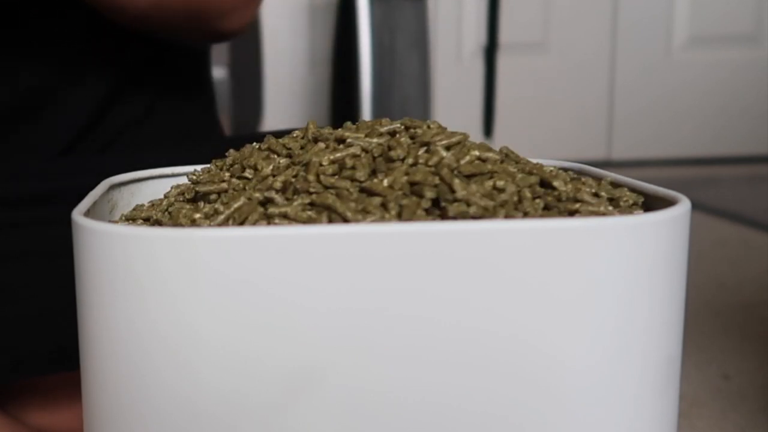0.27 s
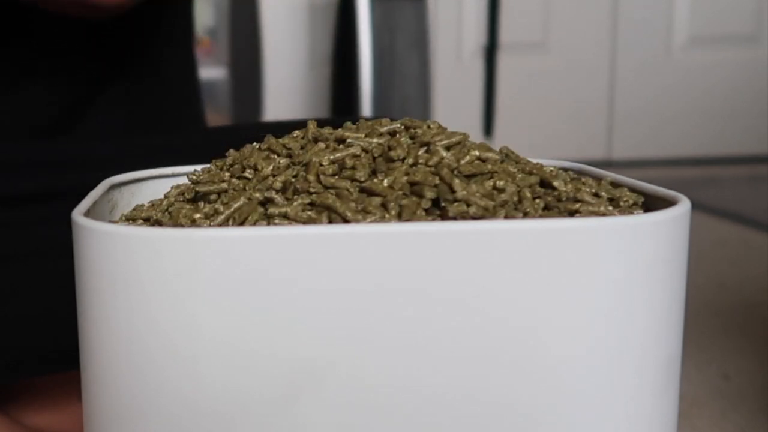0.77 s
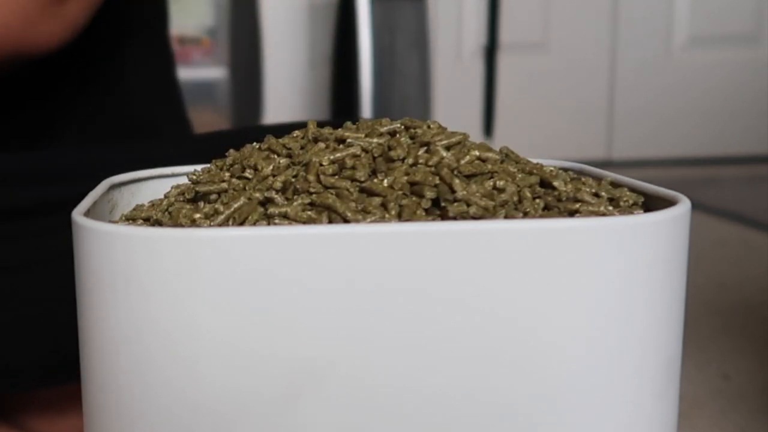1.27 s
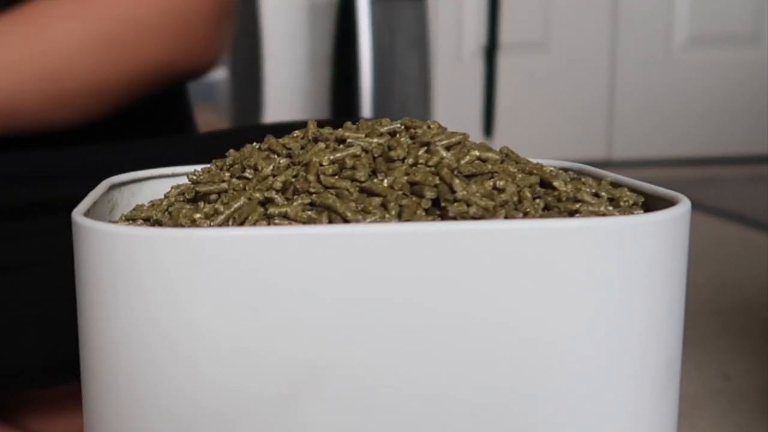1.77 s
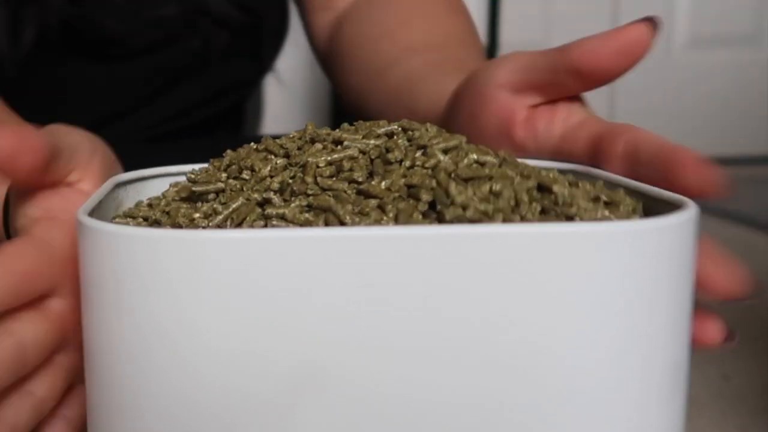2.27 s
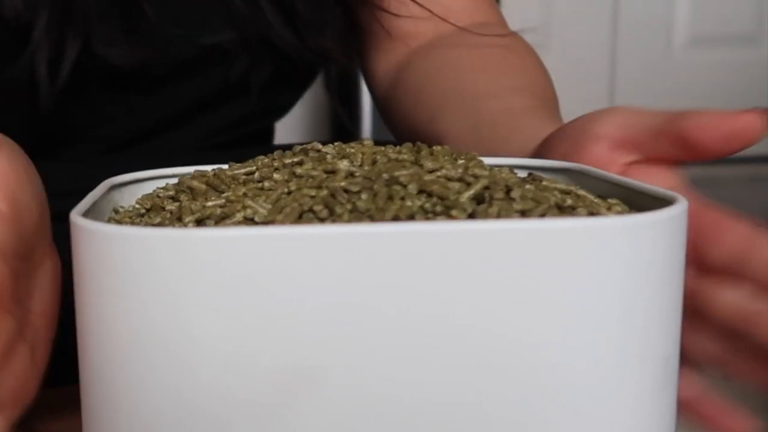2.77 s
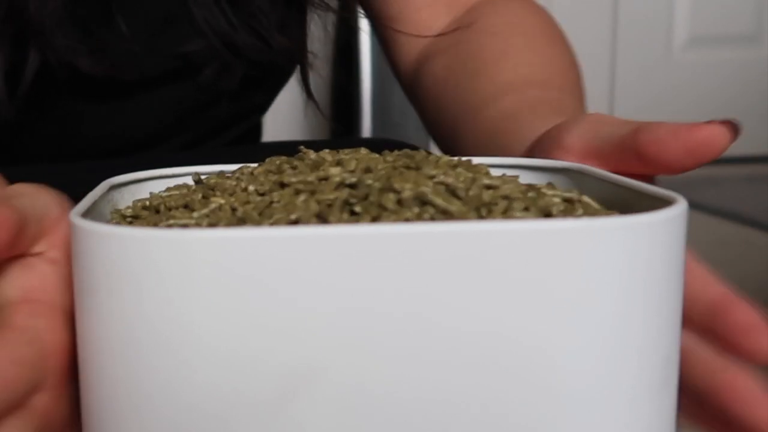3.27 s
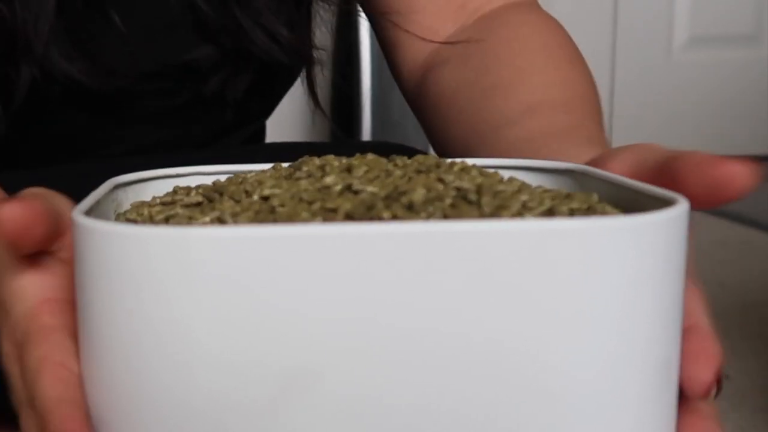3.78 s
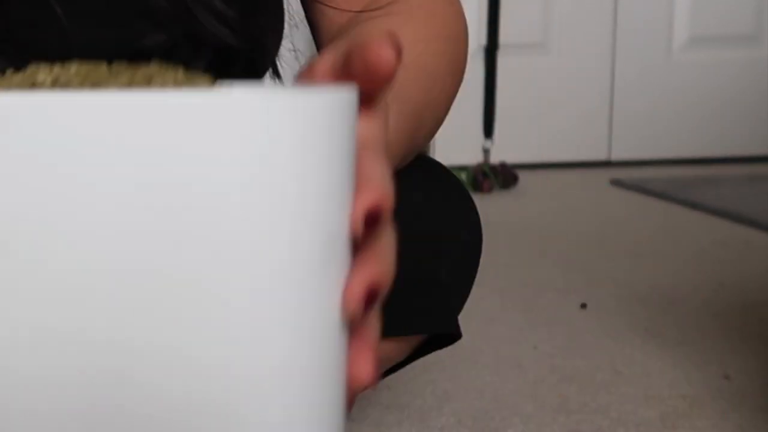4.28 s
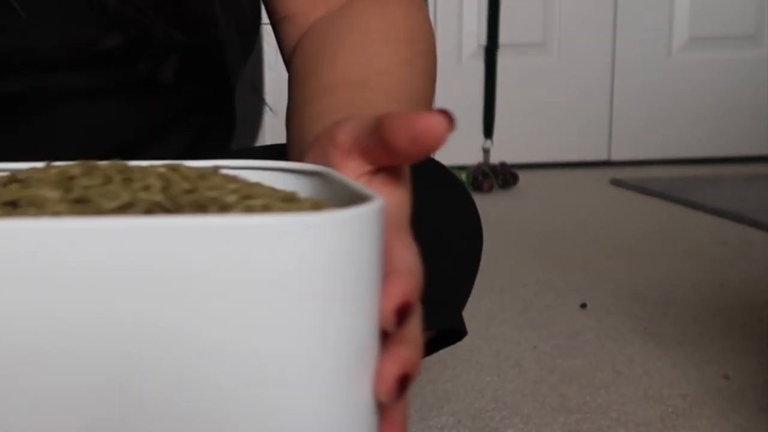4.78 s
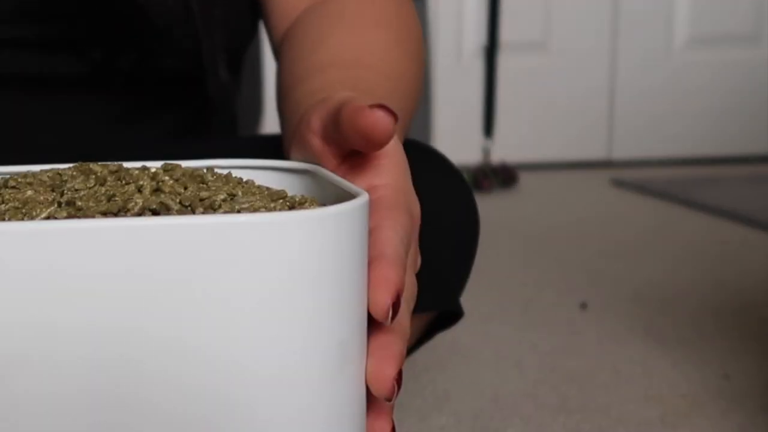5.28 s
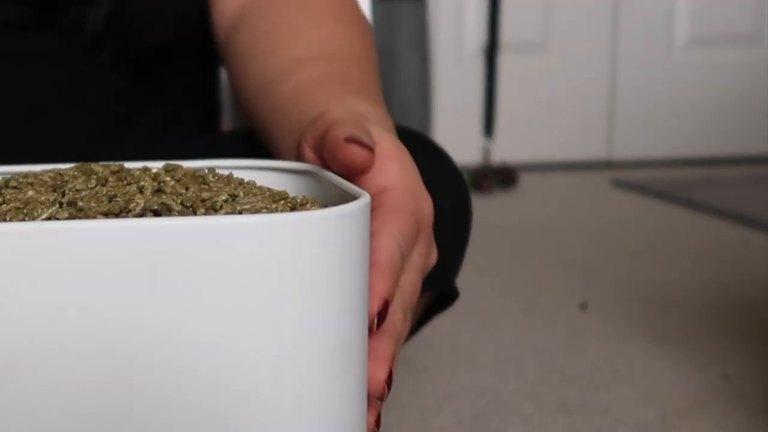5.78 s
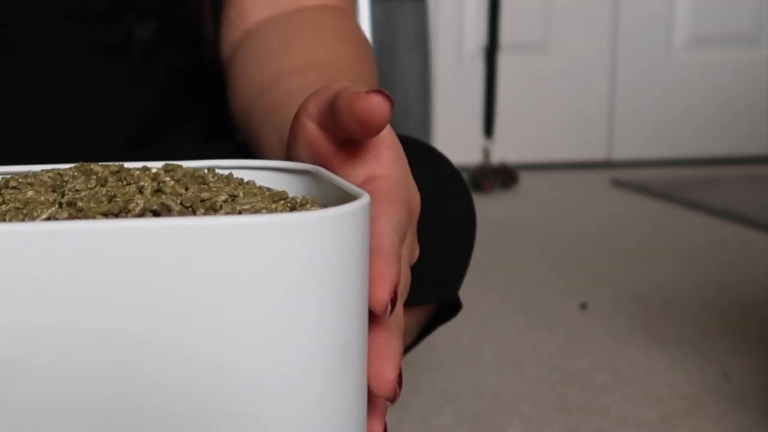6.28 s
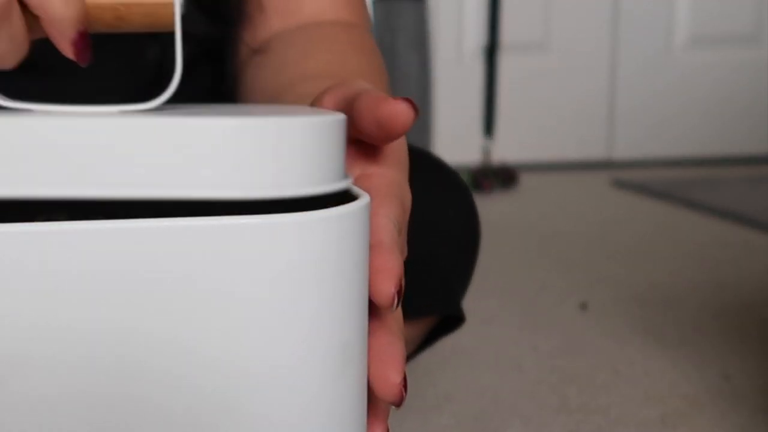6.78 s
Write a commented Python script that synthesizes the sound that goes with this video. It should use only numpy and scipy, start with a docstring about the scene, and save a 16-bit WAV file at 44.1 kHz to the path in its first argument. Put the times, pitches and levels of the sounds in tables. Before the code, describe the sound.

Close stereo microphone, small room with low rumble and slight hiss. First, crisp bag crinkling with snaps and low flaps, fading out. Next, nine quick irregular palm slaps on a metal bin packed with dry pellets, thudding and shaking loose little rattles. A soft set-down and tiny grainy shifts follow, then a quiet gap, barely audible lid rubbing and squeaks, and one loud short metallic clank with a small seating knock.

```python
"""Handling a bin of pellets

A metal bin full of dry feed pellets stands on the floor of a small room, heard from close by.
A bag is dragged aside, its creases crackling by stick-slip; two hands pat the bin nine times, ringing
its damped wall, and the pellets settle after each pat in a rattle of collisions. The bin is lifted and
set down; its tin lid is picked up with a faint frictional scrape and dropped on with a modal clank."""
import sys
import numpy as np
from scipy import signal
from scipy.fft import rfft, irfft
from scipy.io import wavfile
from scipy.ndimage import uniform_filter1d

SR = 44100
rng = np.random.default_rng(int(sys.argv[2]) if len(sys.argv) > 2 else 0)


def to_wav(s):
    """Save 16-bit WAV."""
    ch = np.atleast_2d(s).T  # columns
    pcm = np.round(np.clip(ch, -1, 1) * 32767)  # PCM
    wavfile.write(sys.argv[1], SR, pcm.astype(np.int16))


N = 310464
TIME = np.arange(N) / SR

# creases of the bag snapping: start_s, level_db, decay_s, treble_db
SNAPS = [(0.049, -36.5, 0.0066, -6), (0.103, -33, 0.00079, -5), (0.138, -36, 0.0025, -6),
         (0.221, -28, 0.0027, -13), (0.268, -37, 0.001, -11), (0.274, -27, 0.005, -1),
         (0.296, -34, 0.001, -7), (0.318, -27, 0.0048, -1), (0.495, -32.5, 0.0026, -1),
         (0.612, -33.5, 0.0031, -26), (0.646, -40.5, 0.0021, 1), (0.681, -32.5, 0.0038, 11),
         (0.704, -34, 0.0046, -10), (0.722, -43, 0.003, -8.5), (0.81, -28, 0.0098, -11),
         (0.831, -26.5, 0.0044, 12), (0.8369, -25, 0.00053, 17), (0.839, -22.5, 0.002, 32.5),
         (0.895, -30, 0.012, 1), (0.971, -35.5, 0.02, -24), (1.031, -31.5, 0.0034, 5),
         (1.075, -40, 0.002, -20), (1.0944, -33.5, 0.0012, -1), (1.123, -24, 0.0015, 31),
         (1.19, -37, 0.0039, 20), (1.276, -35.5, 0.0024, 9), (1.331, -29, 0.019, 3),
         (1.54, -52, 0.0026, -28), (1.675, -54.5, 0.0014, 9), (1.6845, -52, 0.00023, -5),
         (1.71, -50, 0.007, -35)]
# spectrum of a crease snapping or a hard edge striking: frequency_hz, relative_gain_db
SNAP_SPECTRUM = [(120, -54), (200, -16), (560, 8.5), (1750, 1), (2700, 4), (4810, -11.5), (5760, -15.5),
                 (6530, -16.5), (9380, -33.5), (11200, -47), (15000, -40.5)]
# blows on the bin, nine pats and the set-down: start_s, slap_db, thump_db, thump_hz, treble_db,
# rattle_db (pellets shaken loose), early_s (lead of a first graze), graze_db, graze_decay_s
BLOWS = [(2.003, -33.5, -33.5, 210, -26, -62, 0.0023, -67, .01),
         (2.324, -21.5, -27, 217, 28, -42, 0.013, -44, 0.014),
         (2.508, -32, -30.5, 228, 1, -50, 0.01, -51, 0.0098),
         (2.689, -32.5, -29, 211, 4, -49, 0.024, -48.5, 0.0064),
         (2.902, -31.5, -25, 233.6, 21, -43.5, 0.02, -40, 0.0092),
         (3.078, -28, -34.5, 166.6, 3.5, -45.5, 0.016, -48, 0.02),
         (3.269, -26.5, -29.5, 214.5, 8.5, -45.5, 0.0097, -35, 0.029),
         (3.4595, -24, -23, 208.4, 10, -39, 0.001, -44, 0.0049),
         (3.68, -26.5, -23, 232, 29, -37, 0.0047, -40, 0.015),
         (4.423, -43.5, -46.5, 165, -13, -55, 0.011, -51.5, 0.029)]
# spectrum of pellets colliding: frequency_hz, relative_gain_db
PELLET_SPECTRUM = [(180, -68), (300, -5.5), (835, -4), (3690, -0.5), (5390, -8.5), (7500, -12.5),
                   (10100, -26.5), (10800, -70), (11300, -45), (12100, -20.5), (14300, -37), (15500, -89)]
# the heap slipping by itself as the bin is handled: start_s, crunch_db, crunch_decay_s, rattle_db
SLIPS = [(2.018, -53, 0.0034, -63), (2.042, -52, 0.002, -64.5), (2.156, -59, 0.013, -75),
         (3.859, -53, 0.0034, -60), (4.427, -35, 0.012, -57), (4.466, -46.5, 0.0053, -55.5),
         (4.506, -56, 0.0089, -65), (4.523, -49.5, 0.0031, -59), (4.558, -54, 0.0033, -65),
         (4.66, -65, 0.0033, -84), (4.701, -67.5, 0.0022, -84), (4.881, -66, .003, -77),
         (4.908, -66, .003, -82), (4.988, -54.5, 0.012, -70), (5.029, -60, 0.0024, -85),
         (5.138, -58, .004, -84), (5.231, -67.5, 0.00085, -86)]


def amp(db):
    """Level: decibels become a gain in amplitude."""
    return np.exp(np.asarray(db) * np.log(10) / 20)


def unit(x):
    """Normalisation: a signal is scaled to rms 1."""
    return x / np.sqrt(np.mean(x ** 2) + 1e-20)


def punch(sound):
    """Equal energy: a short sound is scaled to the energy of 3 ms at rms 1."""
    return sound * np.sqrt(round(.003 * SR)) / np.linalg.norm(sound)


def read(points, hz):
    """Interpolation: a curve is read on a log-frequency axis."""
    f, value = np.transpose(points)
    return np.interp(np.log(hz + 1), np.log(f + 1), value)


def add(mix, s, sound):
    """Superposition: a sound is mixed in at time s."""
    part = mix[max(round(s * SR), 0):][:len(sound)]
    part += sound[:len(part)]


def colour(x, spectrum, size=4096):
    """Minimum-phase filtering: the log gain fixes the phase, so the response is causal."""
    gain_db = read(spectrum, abs(np.fft.fftfreq(size, 1 / SR)))
    log_gain = np.log(amp(np.maximum(gain_db, -100)))
    response = np.exp(np.conj(signal.hilbert(log_gain)))
    taps = np.fft.ifft(response).real[:size // 2]
    return signal.oaconvolve(x, taps)[:len(x)]


def shelf(x, db, corner_hz):
    """Shelving: the part above a first-order crossover is raised or lowered."""
    low = signal.lfilter(*signal.butter(1, corner_hz, fs=SR), x)
    return low + amp(db) * (x - low)


def grains(per_s, spread_db, size=N):
    """Shot noise: a steady random train of tiny collisions, a few much larger than the rest."""
    chance, large, sign = rng.random(size), rng.exponential(1, size), rng.standard_normal(size)
    hit, force = chance < per_s / SR, np.zeros(size)
    force[hit] = amp(spread_db * np.minimum(large[hit], 4)) * sign[hit]
    return unit(force)


def crack(decay_s, spectrum, grit, size=4096):
    """Impulsive contact: a sharp click with an exponentially dying burst of noise."""
    t = np.arange(size) / SR
    burst = grit * rng.standard_normal(size) * np.exp(-t / max(decay_s, 1e-4))
    click = t == 0
    return colour(burst + click, spectrum)


def ring(modes, t):
    """Modal superposition: sines of random phase, each dying by 60 dB in its t60."""
    return sum(amp(db - 60 * t / t60) * np.sin(2 * np.pi * (hz * t + rng.random()))
               for hz, db, t60 in modes)


def wander(depth_db, size):
    """Slow modulation: a gain drifts at random over about size samples, depth_db in rms."""
    step = 64
    noise = rng.standard_normal(len(TIME[::step]))
    drift = uniform_filter1d(uniform_filter1d(noise, size // step), size // step // 3)
    return np.interp(TIME, TIME[::step], amp(depth_db * unit(drift)))


def swell(start, rise, hold, release):
    """Motion envelope: a movement gathers speed, holds it and decays exponentially."""
    out = np.zeros(N)
    t = np.arange(max(-start, 0), rise + hold + 9 * release, 1 / SR)
    onset = np.sin(np.pi / 2 * np.minimum(t / rise, 1))
    add(out, start, onset * np.exp(-np.maximum(t - rise - hold, 0) / release))
    return out


def room(x):
    """Reverberation: sparse reflections decay at a rate set by frequency and differ at each port."""
    # reverberation time: frequency_hz, t60_s
    decay_times = [(150, 0.24), (600, 0.19), (3000, 0.21), (12000, 0.28)]
    count = SR // 2
    sparse = rng.choice([-1., 1.], (2, count)) * (rng.random((2, count)) < .08)
    taps = sparse * (TIME[:count] > .004)
    hz, t, z = signal.stft(taps, SR, nperseg=256)
    tail = signal.istft(z * amp(-60 * t / read(decay_times, hz)[:, None]), SR, nperseg=256)[1]
    common, apart = tail / np.linalg.norm(tail[0])
    apart = shelf(0.025 * apart, 5.9, 1500)  # close ports hear nearly the same bass
    return signal.oaconvolve(x[None], np.array([common + apart, common - apart]), axes=1)[:, :N]


def place(x, bearing, lean, room_db):
    """Two-port reception: direction sets a difference in phase and treble level; the room answers."""
    # difference over sum of two close microphone ports at bearing 1: frequency_hz, gain_db
    port_difference = [(100, -34), (700, -24), (2400, -19), (4400, -4), (8000, 6.5), (13000, 5)]
    hz = np.fft.rfftfreq(N, 1 / SR)
    out_of_step = 1j * bearing * amp(read(port_difference, hz))
    louder = lean * hz ** 2 / (hz ** 2 + 400 ** 2)
    side = irfft(rfft(x) * (out_of_step + louder), N)
    return np.array([x + side, x - side]) + amp(room_db) * room(x)


def background():
    """Stationary noise and tones: low room rumble, thin hiss and mains hum."""
    # room air: frequency_hz, relative_gain_db
    air_spectrum = [(15, -47.5), (25, -6), (90, -1), (115, -3.5), (146, -4), (176, -7), (301, -15.5),
                    (383, -12.5), (709, -20.5), (1030, -17.5), (1120, -21), (1580, -22.5), (2700, -24),
                    (10900, -42.5), (15000, -68)]
    # mains hum: frequency_hz, level_db (rms)
    hum_tones = [(119, -69.5), (237, -77)]
    common, apart = (unit(colour(rng.standard_normal(N), air_spectrum)) for _ in range(2))
    apart = shelf(0.031 * apart, 29.7, 610)
    air = amp(-65) * np.array([common + apart, common - apart])
    hum = sum(amp(db) * np.sqrt(2) * np.sin(2 * np.pi * hz * TIME) for hz, db in hum_tones)
    return air + hum


def bag_motion():
    """Power addition: one long pull, the grip, short tugs and a shiver after each snap drive the bag."""
    # the long pull gathers speed, holds it and coasts out: start_s, rise_s, hold_s, release_s
    long_pull = (-0.072, 0.28, 0.2, 0.2)
    # the gripped bag stirs softly for about 1.2 s, then fades: start_s, rise_s, hold_s, release_s
    grip = (0.002, 0.042, 1.187, 0.072)
    # short tugs, dying about as fast as they are held: start_s, hold_s, rustle_db, flap_db
    tugs = [(0.026, 0.016, -40, -60), (0.155, 0.019, -38, -46), (0.205, 0.038, -38, -45),
            (0.683, 0.0057, -39.5, -65), (0.782, 0.015, -58, -50), (0.819, 0.014, -37.5, -40),
            (1.034, 0.037, -41.5, -45), (1.184, 0.0097, -40, -44.5), (1.286, 0.022, -41.5, -44),
            (1.33, 0.044, -33.5, -38.5), (1.439, 0.011, -45, -46), (1.527, 0.022, -57, -58.5),
            (1.583, 0.046, -59.5, -89), (1.676, 0.026, -68, -55.5), (1.796, .04, -76, -93)]
    moves = [(long_pull, -30, -52.5), (grip, -48, -54.5)]  # shape, rustle_db, flap_db
    for s, hold_s, db, flap_db in tugs:
        moves.append(((s, 0.0063, hold_s, 1.15 * hold_s), db, flap_db))
    rustle, flap = np.zeros((2, N))
    for shape, db, flap_db in moves:
        power = swell(*shape) ** 2
        rustle += amp(db) ** 2 * power
        flap += amp(flap_db) ** 2 * power
    for s, db, *_ in SNAPS:  # the bag rustles on after each snap
        rustle += (amp(db - 24) * swell(s, 0.0048, 0, 0.0073)) ** 2
    return np.sqrt(rustle), np.sqrt(flap)


def rustling(pull):
    """Stick-slip: grains excite the bag, a dense bright rush when pulled hard, dull slips when slow."""
    # sliding film: frequency_hz, relative_gain_db
    rustle_spectrum = [(120, -34.5), (200, -25), (277, -23), (316, -11.5), (373, -11.5), (599, -1.5),
                       (705, -1.5), (1470, -2.5), (2150, 0), (2410, -1.5), (3510, -6), (6220, -17.5),
                       (10000, -38), (13000, -108), (22000, -120)]
    # resonances of the bag: frequency_hz, relative_db, t60_s
    pouch_modes = [(613, 7, 0.089), (698, 8.5, 0.077), (804, -3.5, 0.31), (1139, 9.5, 0.05),
                   (1556, 1, 0.084), (2100, -2, 0.032), (2810, 5, 0.24)]
    pull_db = 20 * np.log10(pull + 1e-9)
    fast = np.clip((pull_db + 50) / 19, .3, .97)  # power share of the dense grains
    # harder pulls are brighter, and the treble sinks over the first two seconds
    treble_db = np.clip(1.34 * (pull_db + 30.5), -5, 1) - 4.1 * np.minimum(TIME, 2)
    stereo = np.zeros((2, N))
    for bearing in (1.38, .2):  # the near and the far end of the bag
        dense = np.sqrt(fast) * grains(per_s=22000, spread_db=1.4)
        separate = np.sqrt(1 - fast) * grains(per_s=900, spread_db=2.6)
        slips = colour(dense + separate, rustle_spectrum)
        # as the bag changes shape, its resonances come and go
        hollow = np.zeros(N)
        for mode in pouch_modes:
            resonance = signal.oaconvolve(slips, ring([mode], TIME[:SR // 8]))[:N]
            hollow += resonance * wander(4, size=2600)
        # small creases give way one by one, and the drag surges unevenly
        crackle = unit(colour(grains(per_s=380, spread_db=2.2), rustle_spectrum))
        rustle = unit(unit(slips) + .33 * unit(hollow) + amp(-8) * crackle)
        rustle = shelf(rustle * wander(1.1, size=900), treble_db, 1680)
        stereo += place(amp(-3.5) * rustle * pull, bearing=bearing, lean=0.091, room_db=-18.0)
    return stereo


def flapping(flap):
    """Forced vibration: sparse impulses, coloured low, swing the walls of the bag."""
    # flapping walls: frequency_hz, relative_gain_db
    flap_spectrum = [(25, -26.5), (41, -21), (70, -7), (110, -9.5), (170, -2), (279, -2), (311, -7.5),
                     (373, -3.5), (600, -8.5), (780, -27.5), (1320, -120)]
    return amp(-2.5) * unit(colour(grains(per_s=1200, spread_db=1.5), flap_spectrum)) * flap


def snaps():
    """Buckling: each crease snaps through with a click and a brief crackle."""
    out = np.zeros(N)
    for s, db, decay_s, treble_db in SNAPS:
        snap = shelf(crack(decay_s, SNAP_SPECTRUM, grit=0.34), treble_db, 1570)
        add(out, s, amp(db) * punch(snap))
    return out


def bag():
    """Common drive: one motion makes the bag rustle and flap, and its creases snap."""
    pull, flap = bag_motion()
    body = place(flapping(flap) + snaps(), bearing=1, lean=0.14, room_db=-17.0)
    return body + rustling(pull)


def thuds():
    """Damped resonance: one mode per touch as the bag, the bin and the lid are handled."""
    # soft thuds and small ticks: start_s, level_db, pitch_hz, t60_s
    touches = [(0.769, -33, 120, 0.07), (0.831, -23, 610, 0.069), (0.967, -47, 308, 0.06),
               (1.039, -46, 241, 0.061), (1.185, -43, 236, 0.039), (1.426, -36, 180, 0.075),
               (1.688, -55, 151, .08), (1.711, -43.5, 773, 0.024), (1.714, -51, 407, 0.04),
               (1.857, -50, 960, 0.018), (2.004, -30, 635, 0.044), (2.758, -38, 2000, 0.01),
               (2.893, -26, 169, 0.029), (3.197, -35, 930, 0.0086), (4.422, -44, 42, 0.32),
               (4.976, -50, 945, 0.015), (5.001, -36.5, 274, 0.017), (6.514, -47.5, 870, 0.021),
               (6.961, -38.5, 252, 0.067), (6.961, -39.5, 870, .065)]
    out, t = np.zeros(N), TIME[:SR // 3]
    for s, db, hz, t60 in touches:
        add(out, s, ring([(hz, db, t60)], t) * (1 - np.exp(-t * hz)))
    return out


def pats():
    """Impact and modal response: a palm slaps the wall, which swings, damped by the pellets."""
    # palm on metal: frequency_hz, relative_gain_db
    slap_spectrum = [(150, -10), (250, -4.5), (717, 4), (2710, 4), (3450, -4), (4550, -11), (6540, -21.5),
                     (7380, -22), (9390, -31), (10800, -43.5), (12400, -29), (15500, -47)]
    # the full bin's wall modes: ratio (to the thump pitch, before detuning), relative_db, t60_s
    wall_modes = [(.48, -12.5, 0.069), (.7, -10.5, 0.11), (1., 3, 0.042), (1.239, -7, 0.092),
                  (2.15, -6, 0.048), (2.5, -10.5, 0.053), (2.8, -0.5, 0.013), (3.2, -14, 0.071)]
    out, t = np.zeros(N), TIME[:SR // 3]
    for s, slap_db, thump_db, thump_hz, treble_db, _, early_s, graze_db, graze_s in BLOWS:
        graze = crack(graze_s, PELLET_SPECTRUM, grit=0.99)
        add(out, s - early_s, amp(graze_db) * punch(graze))
        # fingers land one after another, then a weaker contact lingers
        landing = np.exp(-((t - .007) / .0034) ** 4)
        lingering = .07 * np.exp(-t / .015) * (1 - np.exp(-t / .003))
        force = (landing + lingering) * grains(per_s=14000, spread_db=3.0, size=len(t))
        slap = shelf(colour(force, slap_spectrum), treble_db, 5500)
        add(out, s - .004, amp(slap_db) * punch(slap))
        # the palm lands at a new spot each time and detunes the upper modes
        modes = []
        for ratio, db, t60 in wall_modes:
            detune = 1 + .14 * (ratio > 1) * rng.uniform(-1, 1)
            modes.append((ratio * thump_hz * detune, db, t60))
        swing = ring(modes, t) * (1 - np.exp(-t / 0.0021))
        add(out, s + 0.00231, amp(thump_db) * swing)
    return out


def crunches():
    """Granular slip: the heap gives way in short bursts of contact noise."""
    # pellets grinding: frequency_hz, relative_gain_db
    crunch_spectrum = [(200, -13), (1200, -1.5), (2600, 6), (3700, 1), (5000, -9), (9000, -27.5),
                       (14000, -42)]
    out = np.zeros(N)
    for s, db, decay_s, _ in SLIPS:
        add(out, s, amp(db) * punch(crack(decay_s, crunch_spectrum, grit=0.38)))
    return out


def handling():
    """Shared direction: thuds, pats and crunches reach the ports from one bearing."""
    return place(thuds() + pats() + crunches(), bearing=-0.52, lean=-0.015, room_db=-12.0)


def pellet_motion():
    """Power of agitation: blows throw the heap up, it lands and settles; tilting and creep add to it."""
    # pellets creeping while the bin is steadied: start_s, rise_s, hold_s, release_s
    creep = (4.69, 0.11, 0.22, 0.11)
    # pellets sliding as the bin is tilted: start_s, rise_s, hold_s, release_s
    tilt = (3.93, 0.043, 0.053, 0.045)
    sliding = amp(-81) * swell(*creep) + amp(-79) * swell(*tilt)
    motion = (sliding * wander(4.6, size=1500)) ** 2
    t = TIME[:SR]
    landing = 0.51 + 0.39 * np.exp(-((t - .035) / 0.0042) ** 2)
    settle = landing * (1 - np.exp(-t / 0.0052)) / (1 + (t / 0.053) ** 3.7)
    events = [(blow[0], blow[5]) for blow in BLOWS] + [(slip[0], slip[3]) for slip in SLIPS]
    for s, rattle_db in events:
        add(motion, s, (amp(rattle_db) * settle) ** 2)
    return motion


def pellets():
    """Granular collisions: a dense crowd and pitched ticks rattle, fading as the motion dies."""
    motion, t = pellet_motion(), TIME[:512]
    out, onset = np.zeros((2, N)), 1 - np.exp(-(t / 0.00027) ** 2)
    for bearing in (.8, -1.2):  # both halves of the heap
        crowd = unit(colour(grains(per_s=5000, spread_db=3.7), PELLET_SPECTRUM))
        # pellets of different lengths each tick at their own pitch
        ticks = np.zeros(N)
        for hz in np.geomspace(2100, 4500, num=11):
            hits = grains(per_s=160, spread_db=4.8)
            ticks += signal.oaconvolve(hits, ring([(hz, 0, .013)], t) * onset)[:N]
        rattle = crowd + .75 * unit(ticks)
        out += place(rattle * np.sqrt(motion / 2), bearing=bearing, lean=0, room_db=-13.5)
    return out


def drone():
    """Pure tone: a faint low sine swells while the bin is lifted."""
    # swell of the tone: start_s, rise_s, hold_s, release_s
    lift = (4.07, 0.031, 0.35, .015)
    return amp(-62.5) * swell(*lift) * np.sin(2 * np.pi * 160 * TIME)


def rubs():
    """Friction drive: each stroke wakes the lid's modes by changing amounts; the grip shifts their pitch."""
    # short strokes as the lid is picked up: start_s, hold_s, level_db, shift_hz (of the modes)
    strokes = [(5.665, .06, -71, 87), (5.83, .025, -68, 111), (5.956, .018, -68.5, 101),
               (6.114, .047, -64.5, 6), (6.218, .023, -67, -4), (6.274, .017, -63.5, 0),
               (6.391, .021, -70, 42)]
    # modes of the held lid before the shift: frequency_hz, relative_db (before random change), t60_s
    held_modes = [(904, -5, .09), (1420, 0, .1), (1770, -1, .11), (2250, -3, .04), (2800, -5, .04),
                  (3380, -2, .055), (3480, -3, .03), (3750, -12, .06), (4480, -8, .025)]
    out = np.zeros(N)
    for s, hold_s, db, shift_hz in strokes:
        stroke = swell(0, 0.011, hold_s, 1.7 * hold_s)[:SR // 2]
        friction = grains(per_s=1300, spread_db=2.0, size=len(stroke)) * stroke
        modes = [(hz + shift_hz, mode_db + 2 * rng.standard_normal(), t60)
                 for hz, mode_db, t60 in held_modes]
        sing = signal.oaconvolve(friction, ring(modes, TIME[:SR // 8]))[:len(stroke)]
        rub = unit(sing) + amp(-4) * unit(colour(friction, PELLET_SPECTRUM))
        add(out, s, amp(db) * rub * np.sqrt(np.mean(stroke ** 2)))
    return out


def squeaks():
    """Mode locking: stick-slip holds one mode for a moment; pitch and strength waver with the grip."""
    # squeaks of the rubbed lid: start_s, length_s, level_db, pitch_hz (before jitter), glide_hz
    squeals = [(5.835, .08, -72, 1610, -70), (5.955, .07, -72, 1810, 50), (6.128, .045, -70, 3450, -40),
               (6.125, .14, -66.5, 1745, 45), (6.21, .06, -64.5, 3410, -40), (6.268, .045, -60, 3340, 70),
               (6.255, .065, -67, 1385, 30), (6.27, .075, -69, 1810, 40)]
    out = np.zeros(N)
    for s, length_s, db, hz, glide_hz in squeals:
        u = np.linspace(0, 1, round(length_s * SR))
        jitter, flutter = (unit(uniform_filter1d(rng.standard_normal(len(u)), size))
                           for size in (90, 260))
        pitch = (hz + glide_hz * u) * (1 + .018 * jitter)
        tone = np.sin(2 * np.pi * np.cumsum(pitch) / SR) * amp(4 * flutter)
        add(out, s, amp(db) * unit(tone * np.sin(np.pi * u)))
    return out


def clanks():
    """Modal impact: landing on the rim rings the tin lid, with a clatter of dense modes."""
    # modes of the tin lid: frequency_hz, relative_db (before the tilt), t60_s
    lid_modes = [(237, -27, .2), (264, -29, .5), (370, -19, .2), (614, -19, .19), (902, -14, .15),
                 (991, -24, .3), (1061, -19, .24), (1180, -15, .21), (1407, -3, .2), (1445, -15, .13),
                 (1633, -12, .45), (1767, -8, .15), (1818, 1, .19), (1895, -14, .16), (1946, -15, .35),
                 (2245, -12, .19), (2422, -17, .16), (2635, -9.5, .18), (1545, -16, .13), (2075, -13, .12),
                 (2540, -15, .11), (2750, -14, .11), (3381, -16, .12), (3590, -15, .09), (2849, -12, .17),
                 (2912, -12, .11), (3113, 3, .12), (3289, -11, .16), (3472, -14, .11), (3740, -15, .09),
                 (4000, -19, .14), (4230, -16, .06), (5017, -31, .17), (5448, -28, .12)]
    # the lid lands on the rim, chatters and drops into its seat: start_s, ring_db, clatter_db,
    # edge_db, tilt_db (per octave about 1500 Hz for the ring, treble shelf for the clatter)
    landings = [(6.8374, -24.5, -29.5, -28, -2), (6.8425, -54, -33, -41, 3), (6.8515, -54, -38, -48, 1),
                (6.8735, -60, -44, -56, 0), (6.9602, -47, -43, -62, -5)]
    # dense modes: frequency_hz, relative_gain_db
    clatter_spectrum = [(120, -20), (230, 1), (400, -15), (520, -21), (770, -18), (923, 1), (1300, -6),
                        (1830, 4.5), (2200, 1), (3000, -9), (4000, -9), (4600, -19), (10000, -50),
                        (12300, -42), (15000, -70)]
    out, t = np.zeros(N), TIME[:SR // 2]
    for s, ring_db, clatter_db, edge_db, tilt_db in landings:
        modes = [(hz, db + tilt_db * np.log2(hz / 1500), t60) for hz, db, t60 in lid_modes]
        # the lid is not quite even, so each mode beats with a weaker twin
        modes += [(hz + rng.uniform(21.32, 80.6), db - 14, t60) for hz, db, t60 in modes]
        # the ring builds as it spreads over the sheet; the clatter dies fast, its treble first
        sheet = amp(ring_db) * ring(modes, t) * (1 - np.exp(-t / .004))
        clatter = unit(colour(rng.standard_normal(len(t)), clatter_spectrum)) * np.exp(-t / .02)
        clatter = amp(clatter_db) * shelf(clatter, tilt_db - 90 * t, 3200)
        add(out, s, (sheet + clatter) * (1 - np.exp(-t / 0.00026)))
        edge = crack(0.0019, SNAP_SPECTRUM, grit=0.23)  # the edge meets the rim
        add(out, s, amp(edge_db) * punch(edge))
    return out


def lid():
    """Friction and impact: the tin lid sings in fits when rubbed and clanks when it lands."""
    scrape = place(rubs() + squeaks(), bearing=1.0, lean=0.15, room_db=-7.5)
    return scrape + place(clanks(), bearing=0.35, lean=0.01, room_db=-14)


def scene():
    """Superposition: the sounds of all sources in the room add."""
    return background() + bag() + handling() + pellets() + drone() + lid()


def record(dry):
    """Band limitation: a linear-phase low-pass removes what lies above about 15.9 kHz."""
    taps = signal.firwin(511, 15900, window=("kaiser", 9), fs=SR)
    return signal.oaconvolve(dry, taps[None], "same")


dry = scene()
out = record(dry)
to_wav(out)
```